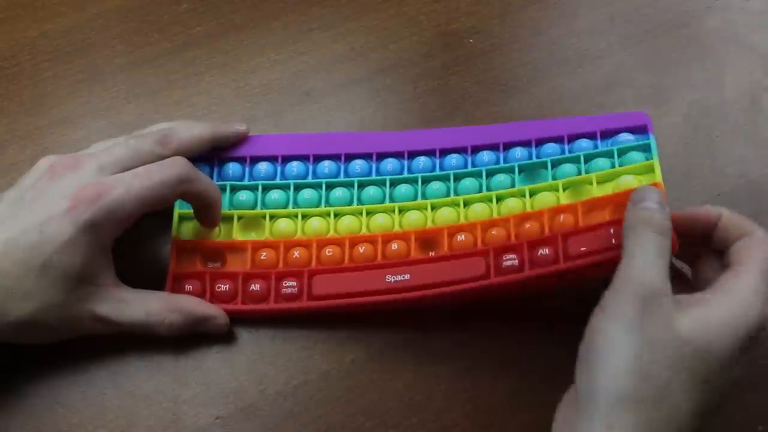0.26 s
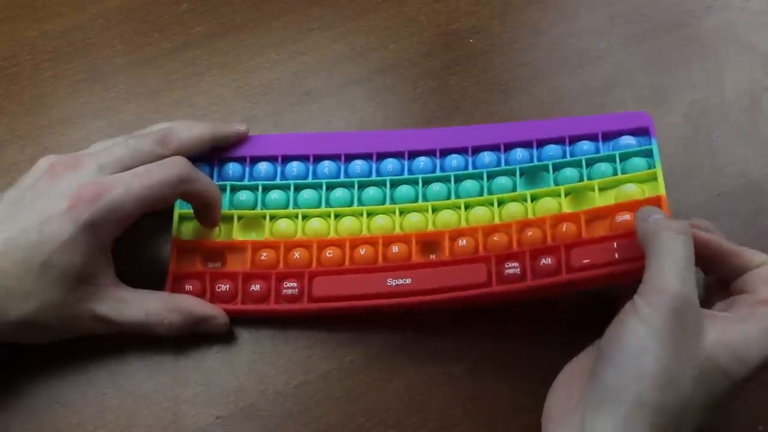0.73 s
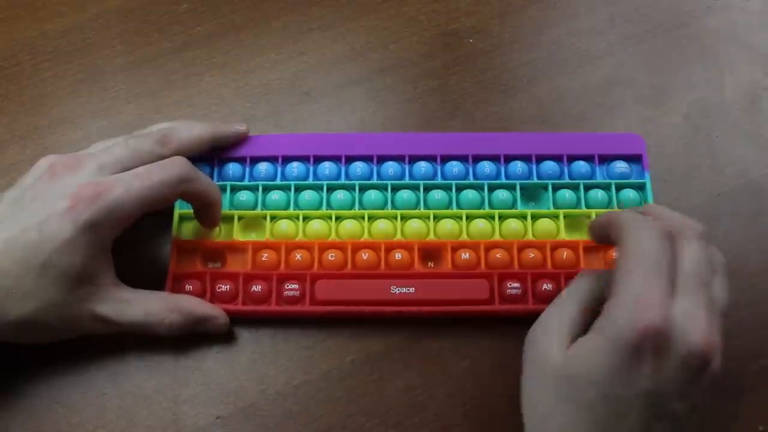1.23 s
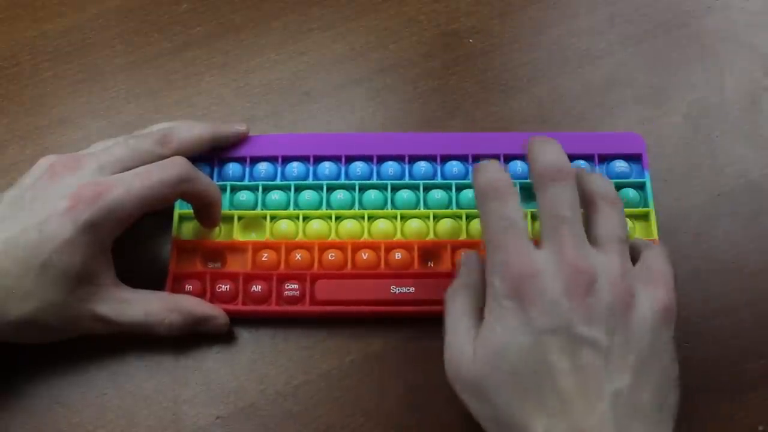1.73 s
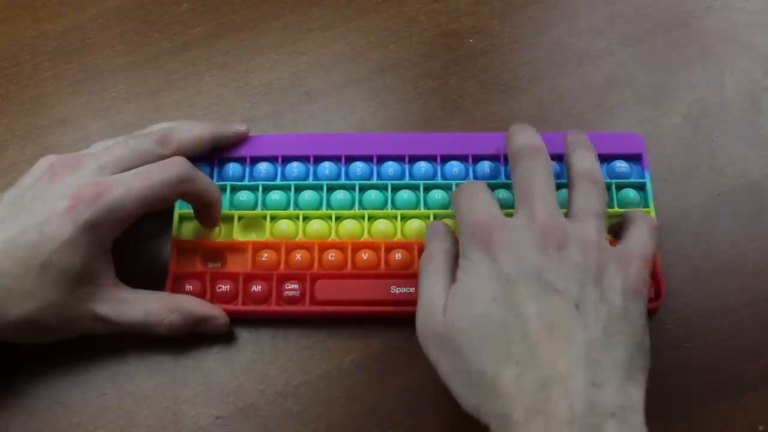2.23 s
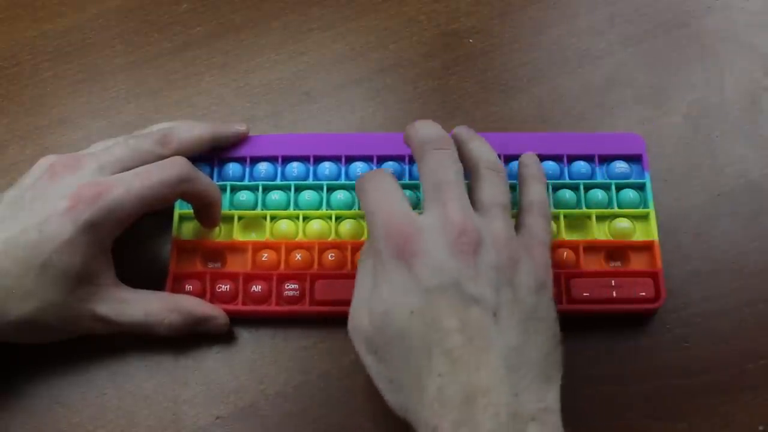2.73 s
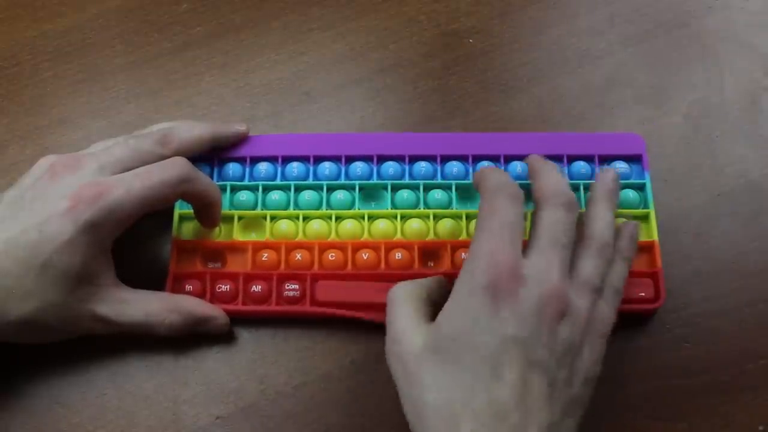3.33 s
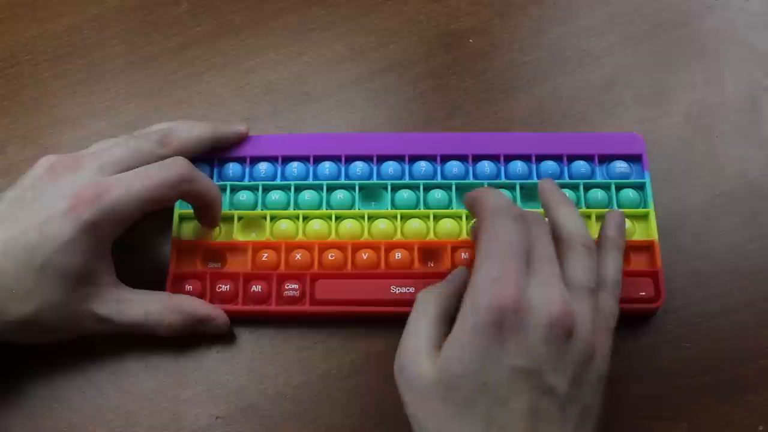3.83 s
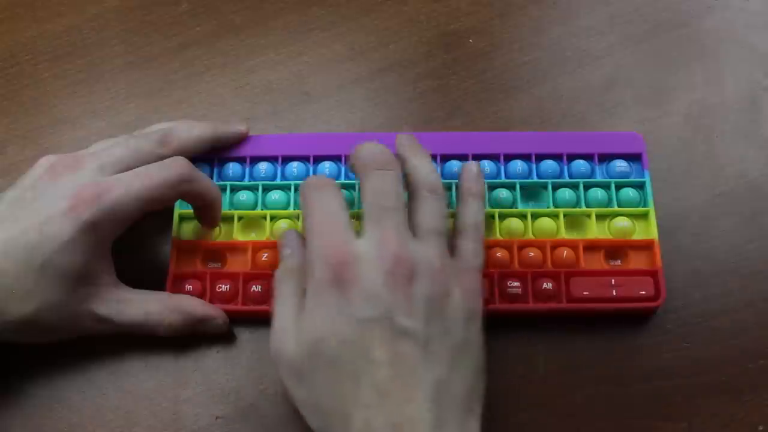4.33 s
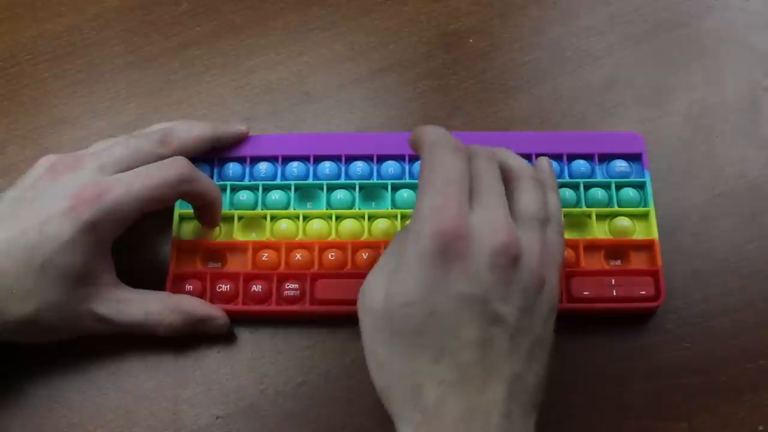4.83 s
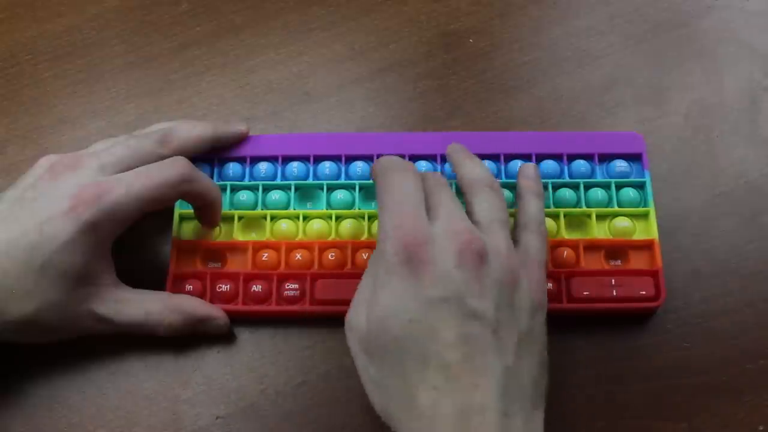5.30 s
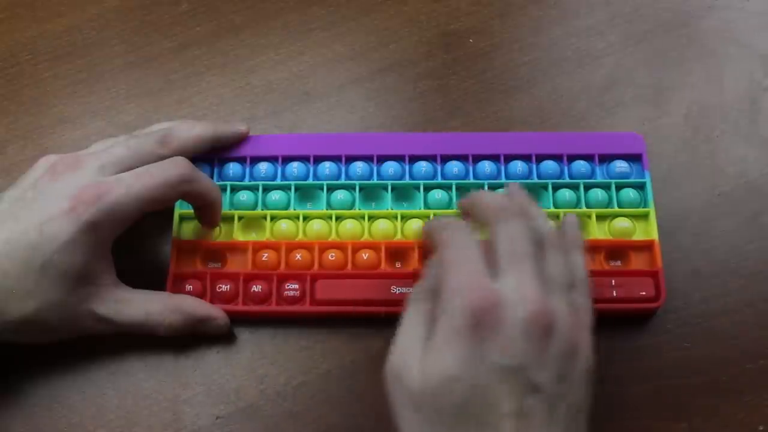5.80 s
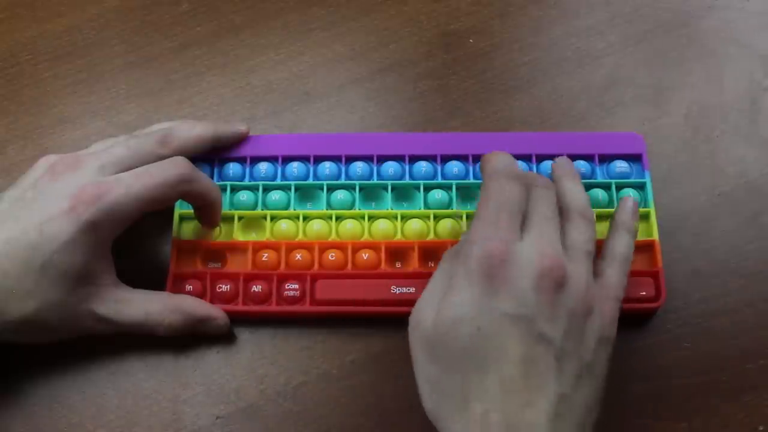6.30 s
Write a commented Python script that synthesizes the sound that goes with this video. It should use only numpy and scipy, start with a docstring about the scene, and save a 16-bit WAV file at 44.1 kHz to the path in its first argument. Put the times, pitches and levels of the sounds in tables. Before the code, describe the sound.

Someone handles a rubber popping toy on a wooden desk. Soft rubbing and springier pops come first, then a strong double pop with a desk knock around one second. Single dull pops follow at uneven gaps, with grainy skin rustle and tiny clicks between them. A low steady hum and deep rumble continue throughout; the close indoor pickup has only a short, dry room echo.

```python
"""A machine's wavering hum runs through a quiet room over rumble and hiss, while fingers press the domes of
a silicone bubble toy on a wooden desk, close to a camera. Hums are wavering sines, backgrounds shaped noise.
Skin and air rustle over the rubber as swelling noise; the desk thuds and rings low as damped sines.
Domes snap through with short pops of damped sines and a noise crack; skin unsticks in noise ticks.
The room answers pops, ticks and rustle briefly with decaying noise tails."""
import sys
import numpy as np
from scipy import signal
from scipy.fft import rfft, irfft, next_fast_len
from scipy.io import wavfile
from scipy.ndimage import map_coordinates

SR = 44100
rng = np.random.default_rng(int(sys.argv[2]) if len(sys.argv) > 2 else 0)


def to_wav(s):
    """Save 16-bit WAV."""
    ch = np.atleast_2d(s).T  # columns
    pcm = np.round(np.clip(ch, -1, 1) * 32767)  # PCM
    wavfile.write(sys.argv[1], SR, pcm.astype(np.int16))


N = 289296


def amp(db):
    """Decibels to linear amplitude."""
    return 10 ** (np.asarray(db) / 20)


def unit(x):
    """Scale to rms 1."""
    return x / np.sqrt(np.mean(x ** 2) + 1e-20)


def along(points, hz):
    """Interpolate (freq_hz, value) points on a log frequency axis."""
    point_hz, values = np.transpose(points)
    return np.interp(np.log(hz + 1), np.log(point_hz + 1), values)


def wobble(knots_per_s):
    """Smooth random curve through normally distributed knots."""
    knots = rng.standard_normal(int(N * knots_per_s / SR) + 4)
    return map_coordinates(knots, [np.arange(N) * knots_per_s / SR])


def filtered(x, response):
    """Multiply the spectrum of x by a response of frequency in Hz."""
    size = next_fast_len(N + SR // 2)
    spectrum = rfft(x, size) * response(np.fft.rfftfreq(size, 1 / SR))
    return irfft(spectrum, size)[..., :N]


def resonance(f, modes):
    """Sum of steep resonances: each is a squared second-order bandpass magnitude."""
    total = 0
    for centre_hz, width_hz, level_db in modes:
        damping = 1j * f * width_hz
        bandpass = f * width_hz / (centre_hz * centre_hz - f * f + damping + 1e-9)
        total = total + amp(level_db) * abs(bandpass) ** 2
    return total


def resonant(x, modes):
    """x through resonances, rms 1."""
    return unit(filtered(x, lambda f: resonance(f, modes)))


def burst(size, modes):
    """Short noise through resonances, rms 1."""
    spectrum = rfft(rng.standard_normal(size))
    return unit(irfft(spectrum * resonance(np.fft.rfftfreq(size, 1 / SR), modes), size))


def snap(size, modes, t60_s, attack_s):
    """Dying puff of noise through resonances, peak 1."""
    t = np.arange(size) / SR
    puff = rng.standard_normal(size) * amp(-60 * t / t60_s) * (1 - np.exp(-t / attack_s))
    delay = np.exp(-2j * np.pi * np.fft.rfftfreq(size) * 12)  # 12 samples
    out = irfft(rfft(puff) * resonance(np.fft.rfftfreq(size, 1 / SR), modes) * delay, size)
    return out / np.max(abs(out))


def ring(t, hz, t60_s, attack_s):
    """Damped sine with a soft start."""
    return np.sin(2 * np.pi * hz * t) * amp(-60 * t / t60_s) * (1 - np.exp(-t / attack_s)) ** 3


# hum level curve, before its random waver: time_s, rms_db
HUM_LEVEL = [(0, -43), (.5, -51.5), (1.1, -49), (1.7, -43), (2.1, -45.5), (2.45, -44), (2.75, -50.5),
             (3.4, -51.5), (4, -54), (4.5, -50), (5.2, -47.5), (5.7, -46.5), (6.1, -46), (6.56, -45.5)]
# fainter machine tones, before their random waver: pitch_hz, rms_db
WHINE_TONES = [(156, -76.5), (221, -71), (250, -73), (500, -85), (753, -86), (904, -87), (1265, -90.5)]
HUM_HZ = 108.84


def machine():
    """Hum carried by the desk, with fainter tones; all waver in level and phase."""
    t = np.arange(N) / SR
    hum_db = np.interp(t, *np.transpose(HUM_LEVEL)) + 1.7 * wobble(8.3)
    hum = amp(hum_db) * np.sin(2 * np.pi * HUM_HZ * t + 0.9 * wobble(2.6))
    tones = np.zeros(N)
    for pitch_hz, rms_db in WHINE_TONES:
        level = amp(rms_db + 3.6 * wobble(2.5))
        tones += level * np.sin(2 * np.pi * pitch_hz * t + .8 * wobble(13))
    return np.sqrt(2) * (hum + tones)  # rms to peak


# room tone and microphone hiss spectrum, relative: freq_hz, density_db_per_hz
ROOM_SPECTRUM = [(105, -46.5), (135, -16), (160, -14.5), (185, -21), (240, -25), (290, -23), (500, -33),
                 (1000, -36.5), (1400, -42), (2000, -44), (3000, -48), (5000, -49), (8000, -44.5),
                 (16000, -40.5)]
# building rumble spectrum, relative: freq_hz, density_db_per_hz
RUMBLE_SPECTRUM = [(15, -3.5), (30, 1), (45, -8), (60, -17), (80, -16.5), (130, -18.5), (160, -58.5)]
ROOM_RMS_DB, RUMBLE_MEAN_DB = -66, -49.5


def background():
    """Shaped noise: room tone with microphone hiss, and building rumble that swells."""
    tone = unit(filtered(rng.standard_normal(N), lambda hz: amp(along(ROOM_SPECTRUM, hz))))
    rumble = unit(filtered(rng.standard_normal(N), lambda hz: amp(along(RUMBLE_SPECTRUM, hz))))
    return amp(ROOM_RMS_DB) * tone + amp(RUMBLE_MEAN_DB + 1.4 * wobble(13)) * rumble


# skin sliding and air squeezed out:
# peak_s, swell_s, fade_s, level_db, hollow_hz, air_db (over level), drag_db (over level)
STROKE_EVENTS = [(.042, .008, 0.03, -55, 4730, -7.5, 6.5), (.097, .05, .075, -56.5, 4815, -1.5, 8),
                 (.235, .075, 0.051, -67.5, 7300, -6.5, 10), (.305, 0.076, .1, -65, 4060, -5.5, 0.5),
                 (.6, 0.12, .045, -72, 4300, -11, 4.5), (.79, 0.046, 0.031, -73, 5100, -13.5, 8.5),
                 (.885, 0.015, 0.023, -64, 4840, -16.5, -4), (.93, .01, 0.035, -64.5, 5300, -37, 4.5),
                 (1.027, 0.078, 0.062, -62.5, 5130, -5, -3), (1.09, .05, 0.037, -67.5, 7430, -1.5, 9),
                 (1.32, .03, 0.076, -69.5, 3730, -26, 2), (1.59, .028, .02, -71.5, 9340, 3, -4),
                 (1.748, .042, 0.052, -59.5, 6300, -6.5, 5), (1.794, .044, 0.084, -69, 6120, -33, 2),
                 (2.2, .045, 0.027, -63, 5900, -11, 5.5), (2.225, 0.028, 0.049, -48, 6240, -11, -8),
                 (2.324, .048, .036, -62, 3960, -13, 6), (2.366, 0.055, 0.048, -57, 5860, -7, -8),
                 (2.747, 0.035, 0.045, -77, 4970, 7.5, 3.5), (2.883, 0.034, 0.012, -51, 6960, -3, 2),
                 (2.998, .04, 0.047, -56, 6060, -6.5, -7.5), (3.309, .033, 0.077, -63.5, 3600, -6.5, -0.5),
                 (3.418, .012, 0.039, -64.5, 4000, 2.5, 9.5), (3.53, .075, 0.042, -74, 5120, -1, 17.5),
                 (3.563, .01, 0.01, -54, 4000, 1.5, 6.5), (3.583, 0.018, .035, -67, 4060, 5, 7),
                 (3.92, 0.024, 0.17, -77.5, 9000, -6, 7.5), (4.083, 0.055, 0.016, -55, 8500, -3, 1),
                 (4.105, .02, 0.07, -64.5, 4950, -39.5, 4), (4.19, .025, 0.027, -51.5, 5090, -19, -4),
                 (4.242, .032, 0.017, -68, 5020, 0, 4), (4.315, 0.023, 0.08, -64, 3640, -14, -2),
                 (4.575, 0.022, .05, -57, 7600, -1.5, 9.5), (4.68, .045, 0.02, -56.5, 5800, -6, 1),
                 (5.281, 0.042, 0.012, -54.5, 6370, -5.5, 5), (5.31, .025, .08, -65.5, 4650, -18, 5),
                 (5.402, .045, 0.056, -56.5, 5860, -5, -8), (5.708, .04, 0.018, -56, 7460, -5, 3.5),
                 (5.722, .01, 0.2, -71, 7060, -8, 7), (5.793, .015, .015, -57, 8000, -9, -13),
                 (5.834, .02, 0.05, -55.5, 7000, -7.5, -8), (6.315, .03, 0.054, -62, 3800, -4, -1),
                 (6.365, .04, 0.043, -68, 7350, -3, 11), (6.405, .018, 0.016, -56.5, 7100, 2, 10.5)]
# rubber sheet resonances: centre_hz, width_hz, level_db
DRAG_MODES = [(700, 990, 15), (1400, 430, 0.5), (3170, 2700, 0.5)]
# escaping air resonance: centre_hz, width_hz, level_db
AIR_MODES = [(12500, 10000, 0)]
SWELL_POWER, FADE_POWER = 3.2, 2.2  # pointedness before and after the peak
CRACKLE_DB, CRACKLE_PER_S = -6, 610  # micro-contacts; level over the drag grains


def grains(depth_db):
    """White noise with a fast random level."""
    return rng.standard_normal(N) * amp(depth_db * wobble(450))


def strokes():
    """Grainy hiss through a dome's hollow, the sheet and the air, swelling and fading with each stroke."""
    air = resonant(grains(0.92), AIR_MODES)
    contact_on = rng.random(N) < CRACKLE_PER_S / SR
    contacts = unit(contact_on * rng.standard_normal(N) * rng.exponential(size=N))
    drag = resonant(unit(grains(2.5)) + amp(CRACKLE_DB) * contacts, DRAG_MODES)
    grit = unit(amp(2.5 * wobble(300)))
    uneven = amp(1.2 * wobble(60))
    out = np.zeros(N)
    for peak_s, swell_s, fade_s, level_db, hollow_hz, air_db, drag_db in STROKE_EVENTS:
        start_s, end_s = peak_s - swell_s, peak_s + fade_s
        n = np.arange(round(start_s * SR), round(end_s * SR))
        phase = np.interp(n / SR, [start_s, peak_s, end_s], [0, np.pi / 2, np.pi])
        power = np.where(n / SR < peak_s, SWELL_POWER, FADE_POWER)
        envelope = abs(np.sin(phase)) ** power
        hollow_modes = [(hollow_hz, .35 * hollow_hz, 0), (hollow_hz, 1.2 * hollow_hz, -13)]
        hollow = grit[n] * burst(len(n), hollow_modes)
        rub = hollow + amp(air_db) * air[n] + amp(drag_db) * drag[n]
        out[n] += amp(level_db) * envelope * rub
    return out * uneven


# fingers landing on the desk through the rubber:
# start_s, level_db, sway_db (over level), panel_db (over level)
THUD_EVENTS = [(.034, -33, 4.5, -2.5), (1.118, -21.5, -2.5, -3.5), (1.743, -30.5, -21, -8),
               (2.229, -47.5, -17, 5), (2.882, -28.5, -25, -11.5), (2.991, -46.5, 9, -8),
               (3.436, -41, 5, -16.5), (3.464, -40.5, 9, -7.5), (3.597, -44.5, 6, -1),
               (4.078, -27.5, -21, -9.5), (4.179, -48, -24, -23), (4.574, -21.5, -4, -11.5),
               (4.659, -38, 9, -11), (5.279, -27, 0, -25.5), (5.401, -50.5, 17.5, -8.5),
               (5.708, -22.5, -9.5, -11), (5.908, -51.5, 14, 0), (5.939, -57.5, -10, 8),
               (6.38, -36, 4.5, -10.5)]
# desk modes (sway, humming board, two more boards, then panel modes): pitch_hz, level_db, t60_s
DESK_MODES = [(28, 4.5, 0.26), (108.9, 4.5, 0.4), (87.05, 8, 0.23), (143, -4, 0.18), (195, -1, 0.19),
              (273.5, -0.5, 0.14), (354.6, -1, .08)]
BOARD_DB = -3.5  # humming board's share of every landing


def thuds():
    """Each landing rings the desk's sway, boards and panel modes as damped sines."""
    out, t = np.zeros(N + SR), np.arange(SR) / SR
    for start_s, level_db, sway_db, panel_db in THUD_EVENTS:
        panel_shares_db = panel_db + rng.normal(0, 2, size=len(DESK_MODES) - 4)
        shares_db = [sway_db, BOARD_DB, 0, 0, *panel_shares_db]
        for (pitch_hz, mode_db, t60_s), share_db in zip(DESK_MODES, shares_db):
            mode = ring(t, pitch_hz, t60_s, 0.2 / pitch_hz)
            out[round(start_s * SR):][:len(t)] -= amp(level_db + mode_db + share_db) * mode
    return out[:N]


# domes snapping through, levels before the bass cut:
# start_s, level_db, dome_hz, rim_hz, rim_db (over level), crack_db (over level)
POP_EVENTS = [(.0401, -10.5, 390, 1560, -1.5, -29), (.173, -11, 946, 650, 14.5, -44.5),
              (.243, -25, 938, 644, 12, -38), (.8023, -3.5, 1068, 1535, 21, -35.5),
              (1.047, -25, 1050, 590, 12.5, -41.5), (1.0942, -19.5, 1060, 700, -1.5, -34),
              (1.1203, 11, 540, 1065, 1, -35), (1.1229, 12, 990, 1810, -2.5, -39.5),
              (1.457, -41, 890, 1590, 9, -27.5), (1.574, -32.5, 605, 1210, 6, -40),
              (1.592, -30.5, 603, 1300, -1, -32), (1.7393, -1.5, 823, 1030, -4.5, -38),
              (1.7512, 3, 772, 2060, 1, -24), (2.2323, -1.5, 492, 1390, 9.5, -26),
              (2.884, -10, 730, 2280, -1.5, -23.5), (2.996, -22, 600, 1740, 0, -30.5),
              (3.434, -25, 487, 1976, 6.5, -18), (3.6131, -15, 476, 850, -0.5, -50.5),
              (4.0672, -12.5, 790, 1150, -20, -27), (4.083, -2, 453, 934, 2, -24),
              (4.462, -31.5, 1077, 1520, 7.5, -37), (4.575, -1, 554, 1176, 1.5, -22.5),
              (4.689, -25.5, 505, 1500, 5.5, -38.5), (5.2807, -14.5, 523, 1490, 1.5, -13.5),
              (5.6143, -18, 450, 1204, 3, -30), (5.696, -21, 604, 1084, -1, -31),
              (5.7101, 5, 627, 1220, 6, -20.5), (5.874, -36.5, 580, 2500, 8.5, -22),
              (6.3931, -12.5, 633, 1160, 8, -21), (6.4138, -12.5, 494, 900, 7.5, -32)]
LIFTED_START_S, LIFTED_END_S = .1, 1.11  # toy's edge is held off the desk
FREE_CYCLES, DAMPED_CYCLES = 15, 5.03  # dome cycles per t60, in the air and on the desk
OVERTONE_RATIO, OVERTONE_DB = 2.1, -12.5  # upper partial, over the rim
CRACK_MODES = [(3270, 3500, 4.0), (7260, 5000, -6)]  # centre_hz, width_hz, level_db


def pops():
    """A dome buckles: damped dome cycles, a flick of the rim, a weaker sheet flap and a dry crack."""
    out, t = np.zeros(N + SR), np.arange(2048) / SR
    for start_s, level_db, dome_hz, rim_hz, rim_db, crack_db in POP_EVENTS:
        lifted = LIFTED_START_S < start_s < LIFTED_END_S
        t60_s = (FREE_CYCLES if lifted else DAMPED_CYCLES) / dome_hz
        dome = ring(t, dome_hz, t60_s, 0.51 / dome_hz)
        rim = ring(t, rim_hz, 3.46 / rim_hz, 0.6 / rim_hz)
        overtone = ring(t, OVERTONE_RATIO * rim_hz, 2.435 / rim_hz, 0.3 / rim_hz)
        body = dome + amp(rim_db) * rim + amp(rim_db + OVERTONE_DB) * overtone
        flap = amp(-17.5) * ring(t, dome_hz * rng.uniform(1.0, 1.12), 3 * t60_s, .002)
        flap += amp(-15) * ring(t, dome_hz * rng.uniform(.6, .75), 1.6 * t60_s, .002)
        crack = amp(crack_db) * snap(len(t), CRACK_MODES, .008, 0.00021)
        out[round(start_s * SR):][:len(t)] += amp(level_db) * (crack + flap - body)
    # a small dome radiates little bass
    return filtered(out[:N], lambda f: (1j * f / (380 + 1j * f)) ** 2)


# echo decay: freq_hz, t60_s
ECHO_DECAY = [(300, 0.23), (1000, 0.22), (3000, 0.22), (6000, 0.11), (12000, 0.083)]
# echo tail spectrum, relative: freq_hz, level_db
ECHO_SPECTRUM = [(300, 0), (700, -3.5), (1300, 1.5), (2300, -0.5), (4000, 0.5), (8000, 4.5), (16000, -1.5)]


def echo(x):
    """Noise tails: near surfaces answer at once, the room dies away by frequency; a new tail each stretch."""
    out, stretch = np.zeros(N + SR), SR // 4
    for start in range(0, N, stretch):
        hz, t, spectrum = signal.stft(rng.standard_normal(SR // 2), SR, nperseg=128)
        room = amp(-60 * t / along(ECHO_DECAY, hz)[:, None])
        near = amp(4.5 - 60 * t / 0.012)
        shaped = spectrum * (room + near) * amp(along(ECHO_SPECTRUM, hz))[:, None]
        tail = signal.istft(shaped, SR, nperseg=128)[1]
        tail = np.pad(tail, (60, 0)) / np.linalg.norm(tail)  # 60-sample delay
        wet = signal.fftconvolve(x[start:start + stretch], tail)
        out[start:][:len(wet)] += wet
    return out[:N]


# skin unsticking from the rubber, the clearest ticks: start_s, peak_db, colour_hz
TICK_EVENTS = [(.41, -51, 1500), (0.4587, -52, 5000), (0.5493, -49, 4360), (.5686, -54, 4030),
               (.7148, -47, 2496), (.7274, -56, 1440), (1.5773, -37, 9000), (1.7215, -38, 4500),
               (1.8946, -41, 2660), (1.9846, -45.5, 1825), (2.0815, -57.5, 1507), (2.4114, -42.5, 5960),
               (2.4641, -47.5, 4000), (2.908, -50, 5930), (2.9748, -45.5, 1200), (3.1725, -46.5, 1510),
               (3.2051, -41, 890), (3.236, -49, 1610), (3.4111, -44.5, 4170), (3.427, -42, 8000),
               (3.462, -45, 5000), (3.466, -54, 4060), (3.492, -47.5, 5050), (3.5104, -51, 5000),
               (3.5182, -42.5, 4000), (3.538, -42, 4000), (3.5429, -44.5, 6000), (3.598, -46, 7000),
               (3.6491, -47.5, 5000), (4.0532, -41, 3940), (4.1527, -40, 3000), (4.165, -50, 3580),
               (4.172, -48, 3550), (4.176, -44, 4460), (4.1862, -66, 5030), (4.6404, -42, 1530),
               (5.302, -52.5, 6000), (5.3944, -44, 1500), (5.6331, -50, 6010), (6.2868, -50.5, 1490)]
TICK_MID_DB, TICK_TREBLE_DB = -13, -26  # over a tick's colour


def ticks():
    """Skin unsticks: milliseconds of broad noise around each tick's colour."""
    out, size = np.zeros(N + SR), 512
    for start_s, peak_db, colour_hz in TICK_EVENTS:
        modes = [(colour_hz, 2.3 * colour_hz, 0), (4000, 4000, TICK_MID_DB), (10000, 9000, TICK_TREBLE_DB)]
        tick = snap(size, modes, .003, .0001)
        out[round((start_s + .001) * SR):][:size] += amp(peak_db) * tick
    return out[:N]


def scene():
    """Mix all sources; the room answers the toy and the rubbing."""
    toy = pops() + ticks()
    rub = strokes()
    toy_echo = amp(-11.5) * echo(toy)
    rub_echo = amp(-7.5) * echo(rub)
    return (toy + toy_echo + rub + rub_echo + thuds() + machine() + background())[None]


BAND_LIMIT_HZ = 15850


def record(dry):
    """The camera keeps nothing above its band limit."""
    return filtered(dry, lambda hz: hz < BAND_LIMIT_HZ)


dry = scene()
out = record(dry)
to_wav(out)
```